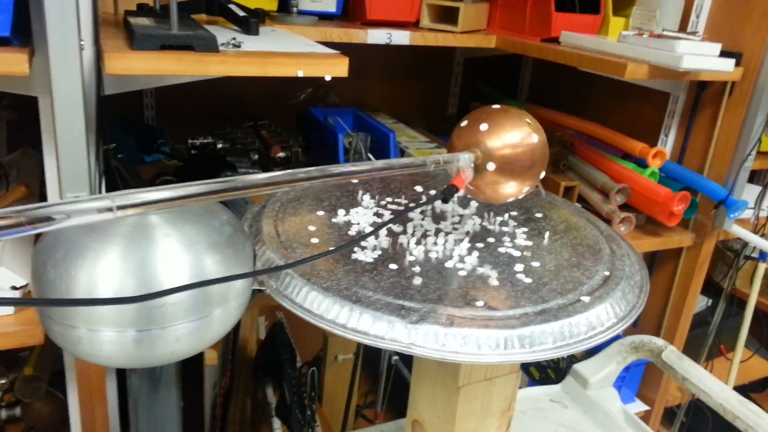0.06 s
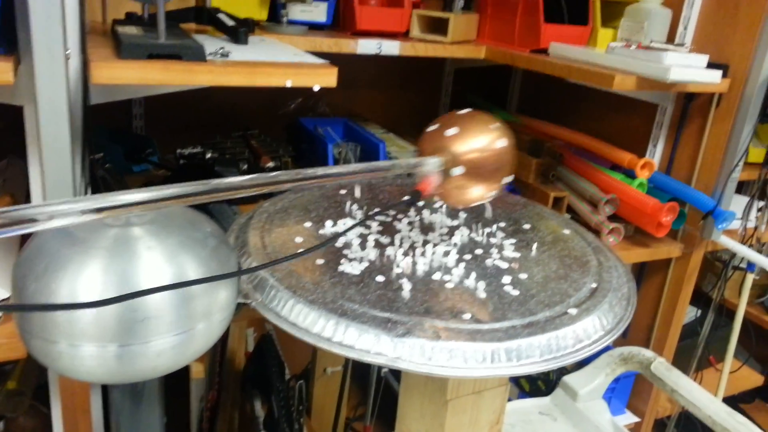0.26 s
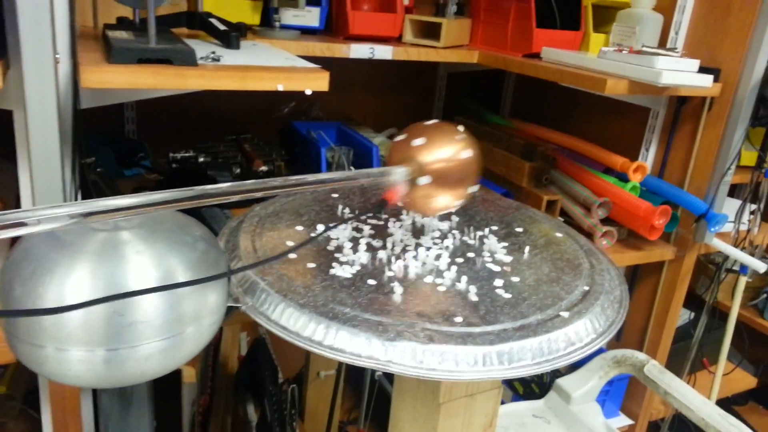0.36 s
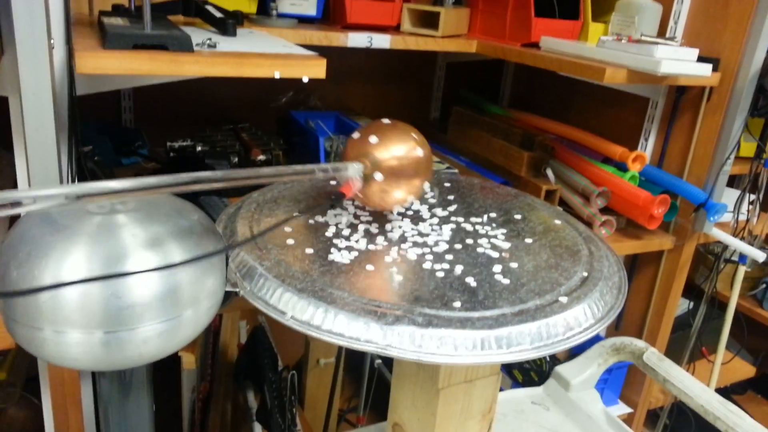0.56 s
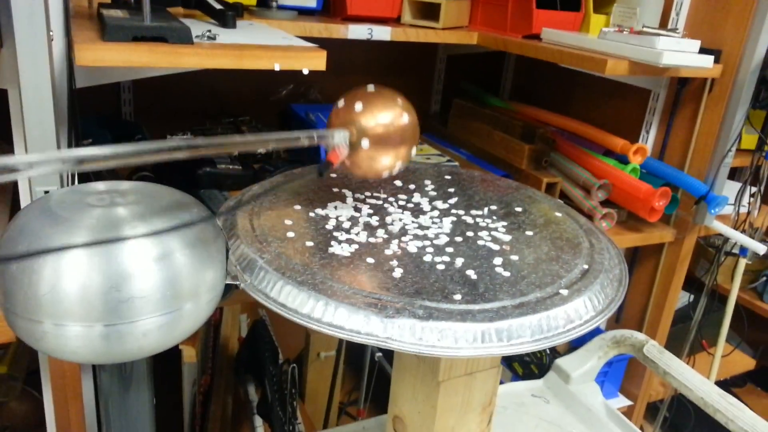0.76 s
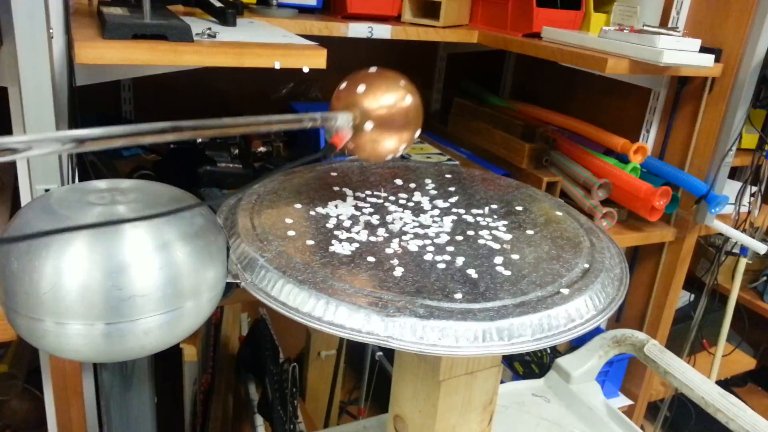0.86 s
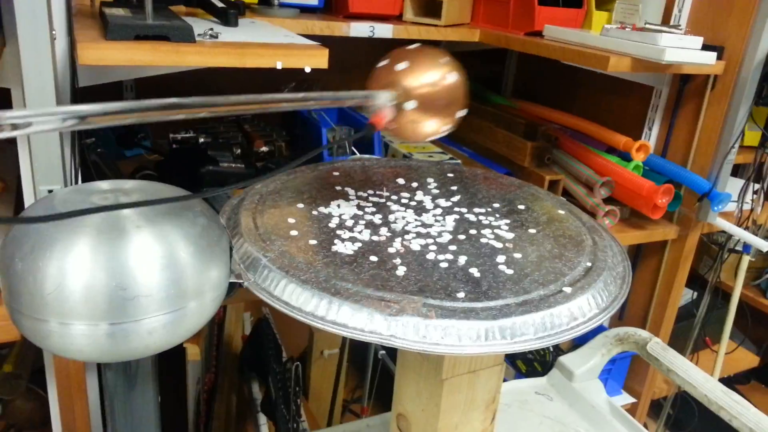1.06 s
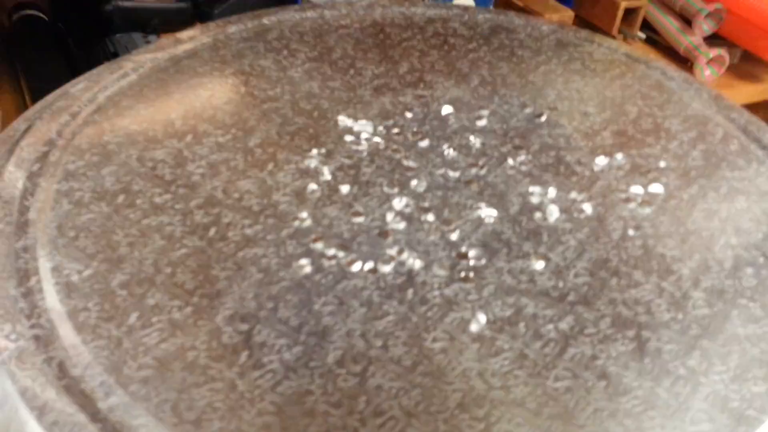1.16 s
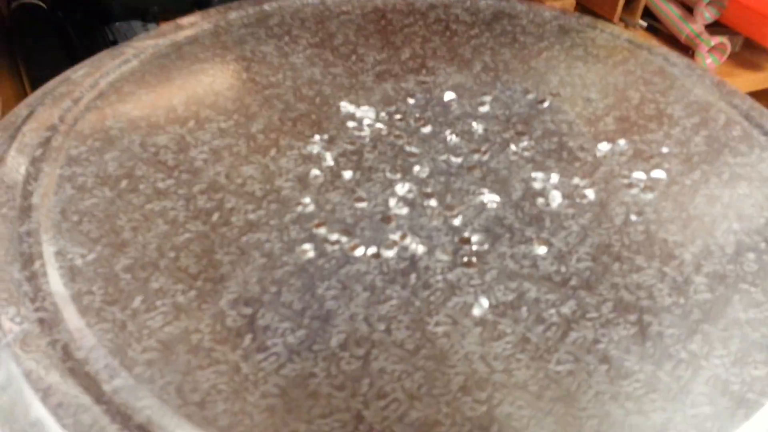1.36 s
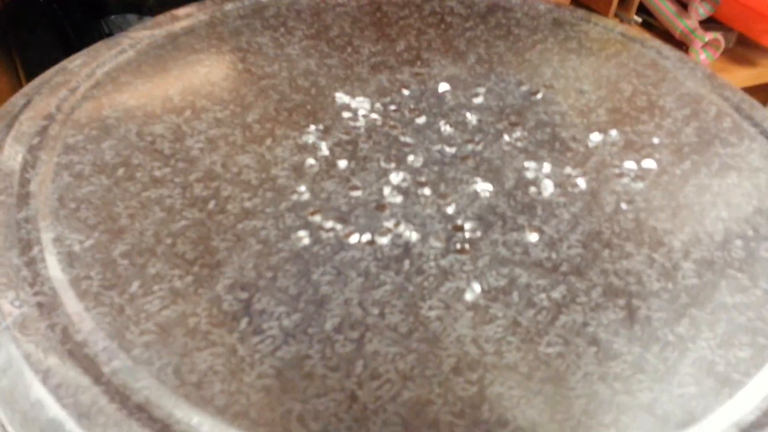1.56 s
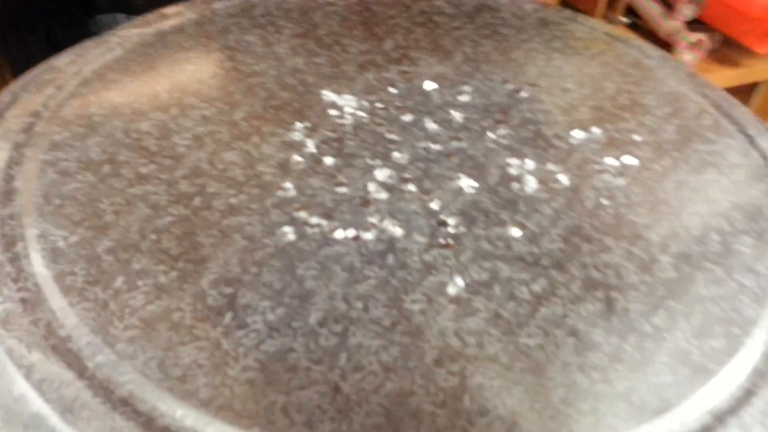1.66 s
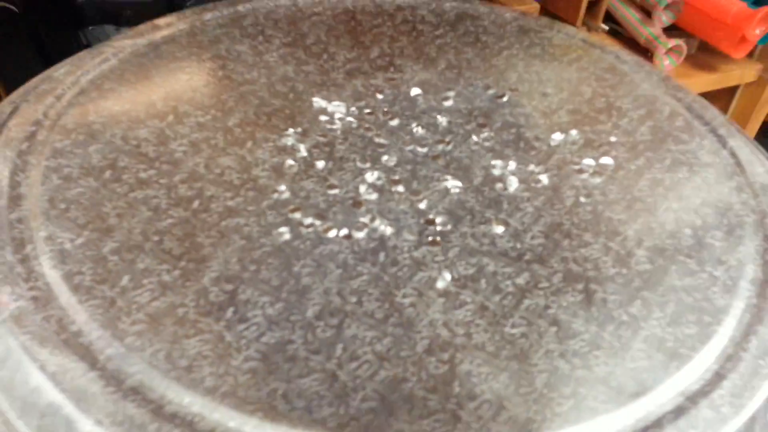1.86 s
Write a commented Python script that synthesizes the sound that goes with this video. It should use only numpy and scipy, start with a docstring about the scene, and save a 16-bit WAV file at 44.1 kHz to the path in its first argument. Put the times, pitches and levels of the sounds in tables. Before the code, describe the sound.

An electrostatic generator's motor whines with a fast throb and belt noise in a workshop. During the first 0.4 seconds, small sparks tick over a faint, high fizz. At about 0.45 seconds one loud, bright spark cracks, with a short room echo. The motor carries on until it cuts off at 1.2 seconds, leaving quiet room tone and several soft, dull bumps from 1.5 to 1.9 seconds.

```python
"""In a workshop, an electrostatic generator runs: its motor whines and throbs once a turn, and belt
noise rings the frame. Small sparks snap between a charged ball and a metal pan, over the fizz of
charge leaking into the air. One big spark cracks and the room throws it back. The motor sound ends
abruptly, leaving quiet room tone and a few soft bumps."""
import sys
import numpy as np
from scipy import signal
from scipy.fft import rfft, irfft
from scipy.io import wavfile
from scipy.ndimage import uniform_filter1d

SR = 44100
rng = np.random.default_rng(int(sys.argv[2]) if len(sys.argv) > 2 else 0)


def digitize_waveform(pressure):
    """Quantize a signal to 16-bit integers and store it at the path in sys.argv[1].

    Rows of a 2-D input are taken as channels; values are limited to [-1, 1].
    """
    field = np.atleast_2d(pressure).T
    bounded = np.clip(field, -1, 1)
    quanta = np.round(bounded * 32767).astype(np.int16)
    wavfile.write(sys.argv[1], SR, quanta)


N = 83790
T, HZ = np.arange(N) / SR, np.fft.rfftfreq(N, 1 / SR)
CRACK_S, MOTOR_END_S, SPARK_ATTACK_S = .44545, 1.195, .0002

# how fast the motor spins (time [s], speed [turns per second])
SHAFT_SPEED = [(0, 55.25), (.42, 54.95), (.6, 55.7), (1.2, 55.65)]
# how loud the whine is (time [s], level [dB])
WHINE_LEVEL = [(0, -43.5), (.09, -37), (.22, -41.5), (.32, -37), (.43, -39), (.58, -38), (.64, -42),
               (.72, -36), (.77, -45.5), (.86, -36), (.91, -36), (.97, -43), (1.03, -36), (1.11, -40.5),
               (1.19, -37.5)]
# the whine's tones (pitch [cycles per turn], level [dB], left minus right [dB])
WHINE_TONES = [(12, -5, 2), (13, 0, 2), (14, -12.5, 4)]
# the motor's fainter tones (pitch [cycles per turn], level [dB], left minus right [dB])
HUM_TONES = [(8, -55, -8), (21, -58.5, 5.5), (22, -56.5, 1.5), (26, -57, 0.5), (27, -51, 11.5),
             (31, -59.5, 1), (37, -56.5, 3.5)]
# belt and bearing noise (frequency [Hz], level [dB])
BELT_COLOUR = [(30, -92.5), (70, -95.5), (110, -84.5), (170, -76.5), (300, -75.5), (520, -76), (950, -78),
               (2150, -77.5), (2650, -87.5), (3800, -88), (6000, -91), (10500, -102), (12500, -126)]
# which side that noise leans to (frequency [Hz], left minus right [dB])
BELT_SIDE = [(500, 1), (1000, 2), (1650, 10.5), (2200, 5), (2900, -10.5), (3900, 5), (6000, 2),
             (9000, -2.5)]
# where the motor's frame rings (frequency [Hz], width [Hz], boost [dB])
FRAME_RINGS = [(303, 45, 8), (440, 35, 4), (510, 65, 7), (695, 60, 10.5), (1185, 90, 5), (1490, 100, 8),
               (2070, 120, 5)]
def motor():
    """Neighbouring tones beat, so the whine throbs once a turn; belt noise rings the frame."""
    speed, swell = curve(SHAFT_SPEED), undb(curve(WHINE_LEVEL))
    turn = 2 * np.pi * np.cumsum(speed) / SR
    turn -= np.interp(.415, T, turn)  # one throb peaks at this time
    lag = 2 * np.pi * speed * np.array([[-.00006], [0]])  # the whine reaches the left side later
    whine, hum = 0, 0
    for order, db, side in WHINE_TONES:
        gain = undb(db + 1.2 * waver(11)) * pan(side)
        whine += gain * np.cos(order * (turn + lag) + .15 * waver(41))
    for order, db, side in HUM_TONES:
        right_shift = np.array([[0], [1]]) * min(order / 20, 1) ** 2
        phase = rng.uniform(-.68, 1) + .55 * waver(35) + right_shift
        hum += undb(db + 3 * waver(15.96)) * pan(side) * np.cos(order * turn + phase)
    tones = np.sqrt(2) * swell * (whine + hum / swell.mean())
    frame = sum(db / (1 + (2 * (HZ - hz) / width) ** 4) for hz, width, db in FRAME_RINGS)
    belt = noise(BELT_COLOUR, grain=.31, pan_db=over_hz(BELT_SIDE), boost_db=frame)
    belt *= (1 + .087 * np.cos(turn)) * undb(.44 * waver(17))
    dip = undb(-17.5 * burst(CRACK_S - .0083, .002294, .0089, .032))  # briefly quieter at the crack
    ending = np.clip((MOTOR_END_S - T) / .004 + .5, 0, 1)
    return (tones + belt) * dip * ending


# the crack and its bounces off the pan (delay [s], level [dB])
PAN_BOUNCES = [(0, 0), (.00019, -5), (.00039, -1)]
# duller single echoes from the right (delay [s], level [dB])
SINGLE_ECHOES = [(.0120, -13), (.0143, -12), (.0162, -12), (.0198, -11), (.0363, -14), (.0422, -14),
                 (.0523, -15)]
# the room's wash of echoes (frequency [Hz], level [dB])
ECHO_COLOUR = [(100, -76.5), (400, -72.5), (1000, -67.5), (2500, -68), (4500, -67), (7000, -61),
               (10000, -66.5), (14500, -68.5)]
def big_spark():
    """A shock wave thumps the microphone, then bounces back from shelves and walls."""
    crack = sum(undb(db) * shock(CRACK_S + delay, hz=7800) for delay, db in PAN_BOUNCES)
    slaps = sum(undb(db) * shock(CRACK_S + delay, hz=5200) for delay, db in SINGLE_ECHOES)
    age, thump_hz = np.maximum(T - CRACK_S, 0), 310.8
    swing = np.sin(2 * np.pi * thump_hz * age) * np.exp(-age / .00079)
    thump = -np.gradient(swing) * SR / (2 * np.pi * thump_hz)
    arrival = CRACK_S + .0118
    early = undb(-5.5) * (T > CRACK_S) * (T < arrival)
    first = undb(1) * burst(arrival, SPARK_ATTACK_S, hold=.0018, decay=.008)
    tail = burst(arrival, SPARK_ATTACK_S, hold=.024, decay=.21 / np.log(1000))  # 60 dB down in .21 s
    echo = noise(ECHO_COLOUR, grain=.45, pan_db=.5) * np.sqrt(early ** 2 + first ** 2 + tail ** 2)
    return undb(-1) * pan(5) * crack + undb(-12) * pan(-21.5) * thump + pan(-9) * slaps + echo


# each small spark (time [s], level [dB], left minus right [dB], fade time [s])
SMALL_SPARKS = [(0.0335, -72.5, 2, 0.0051), (0.0548, -71.5, 2, 0.011), (0.0917, -79, 4, 0.005),
                (0.1256, -76.5, 5, 0.0064), (.1340, -70, 4, 0.0072), (0.1753, -82, -1, 0.0044),
                (0.2123, -71.5, 1.5, 0.0084), (0.3361, -66, 0.5, 0.0056), (0.366, -77.5, -0.5, 0.0097),
                (0.3853, -77, 4, .007), (0.405, -79, 4, 0.0023)]
# their sizzle (frequency [Hz], level [dB])
SIZZLE_COLOUR = [(500, -11), (2000, -0.5), (3500, -10), (4800, 0), (7000, 2), (9000, -3.5), (11500, -1.5),
                 (15000, -14.5)]
def small_sparks():
    """Each spark makes a tick, a short sizzle and an echo; one sets the pan ringing."""
    ticks, near_power, far_power = 0, 0, 0
    for start, db, side, decay in SMALL_SPARKS:
        size = undb(db) * pan(side)
        tick_db = 53.5 + 2 * min(db + 71, 0)  # faint sparks lose their tick
        ticks += size * undb(tick_db) * shock(start, hz=6200)
        near_power += (size * burst(start, SPARK_ATTACK_S, hold=.0013, decay=decay)) ** 2
        far_power += (size * burst(start, attack=.00568, hold=0, decay=.19 / np.log(1000))) ** 2
    sizzle = noise(SIZZLE_COLOUR, grain=.244) * np.sqrt(near_power)
    echo = undb(-17.5) * noise(SIZZLE_COLOUR) * np.sqrt(far_power)
    ping = np.sin(2 * np.pi * 5130 * T) * burst(.3865, SPARK_ATTACK_S, hold=0, decay=.005)
    return ticks + sizzle + echo + undb(-40.5) * ping


# how loud the fizz is (time [s], level [dB])
FIZZ_LEVEL = [(0, -84.5), (.08, -92), (.12, -84), (.19, -103.5), (.28, -97.5), (.34, -99.5), (.375, -85.5),
              (.41, -77.5), (.44, -94), (.47, -125)]
# how bright the fizz is (frequency [Hz], level [dB])
FIZZ_COLOUR = [(1000, -19.5), (4000, 3.5), (7500, -1), (11000, 1.5), (15000, -7)]
# its thin, high singing (frequency [Hz], level [dB])
SING_COLOUR = [(6700, -125), (7150, -81.5), (7500, -88), (8000, -80), (8600, -125)]
def leaking_charge():
    """Charge leaks into the air in tiny clicks, and sings as the ball nears the pan."""
    sing = noise(SING_COLOUR, pan_db=-10) * burst(.29, attack=.045, hold=0, decay=.025)
    fizz = noise(FIZZ_COLOUR, grain=.65) * undb(curve(FIZZ_LEVEL))
    return sing + fizz * (T < MOTOR_END_S)


# the room's steady hush (frequency [Hz], level [dB])
ROOM_COLOUR = [(30, -113), (80, -115), (160, -92.5), (420, -89.5), (560, -100), (750, -104), (870, -97.5),
               (1020, -107.5), (6000, -122), (14500, -121)]
# each soft bump (time [s], level [dB])
SOFT_BUMPS = [(1.480, -8), (1.576, -11), (1.64, -11.5), (1.717, -3.5), (1.822, -6), (1.866, -3),
              (1.883, -11)]
# the rustle in a bump (frequency [Hz], level [dB])
RUSTLE_COLOUR = [(90, -108), (170, -74.5), (450, -79), (680, -87), (850, -85), (1100, -93), (3000, -104),
                 (14000, -119)]
def quiet_room():
    """A low hush swells in after the motor, with soft bumps: a dull thud and a short rustle each."""
    rise = undb(-14.5 * np.clip(1 - (T - MOTOR_END_S) / .2, 0, 1))
    rustles, thuds = 0, 0
    for start, db in SOFT_BUMPS:
        rustles += undb(db) * burst(start, attack=.008, hold=.0031, decay=.016)
        hz = 235 * np.exp(.1 * rng.standard_normal())
        tone = np.sin(2 * np.pi * hz * (T - start))
        thuds += undb(db - 47) * burst(start, attack=.005, hold=0, decay=.007) * tone
    hush = noise(ROOM_COLOUR) * rise * undb(1.4 * waver(7.1))
    return hush + noise(RUSTLE_COLOUR) * rustles + thuds


def shock(start, hz):
    """A spark's quick push and pull on the air, strongest around hz."""
    u = np.clip(2 * np.pi * hz * (T - start), -10, 10)
    return -u * np.exp(-u * u / 2)


def burst(start, attack, hold, decay):
    """Rise, hold, then die away; all times in seconds."""
    age = T - start
    return np.clip(age / attack, 0, 1) * np.exp(-np.maximum(age - attack - hold, 0) / decay)


def noise(colour, grain=0., pan_db=0., boost_db=0.):
    """Stereo noise; colour sets its mix of low and high, and grain breaks it into clicks."""
    sizes = np.exp(grain * np.clip(rng.standard_normal((3, N // 16 + 1)), -2, 2))
    white = rng.standard_normal((3, N)) * np.repeat(sizes, 16, axis=1)[:, :N]
    parts = rfft(white / white.std())
    alike = .9 / (1 + (HZ / 911.5) ** 4)  # both sides hear nearly the same bass
    both = np.sqrt(alike) * parts[0] + np.sqrt(1 - alike) * parts[1:]
    shape = undb(over_hz(colour) + boost_db) * (HZ < 14600)
    return irfft(both * shape * pan(pan_db), N) * np.sqrt(SR / 2)


def waver(rate):
    """A smooth random wobble of size about 1; a higher rate is quicker."""
    size = max(int(SR / rate), 20)
    held = rng.standard_normal(N // 20 + 1)[np.arange(N) // size]
    slow = uniform_filter1d(uniform_filter1d(held, size), size)
    return slow / slow.std()


def undb(db):
    """Decibels to gain."""
    return 10 ** (np.asarray(db) / 20)


def curve(rows):
    """Join (time [s], value) rows with straight lines."""
    return np.interp(T, *np.array(rows).T)


def over_hz(rows):
    """Join (frequency [Hz], value) rows, with octaves evenly spaced."""
    hz, value = np.array(rows).T
    return np.interp(np.log(np.maximum(HZ, 1)), np.log(hz), value)


def pan(db):
    """Left and right gains; positive db leans left."""
    return undb(np.array([[1], [-1]]) * db / 2)


def scene():
    """Motor, sparks, fizz and room together."""
    return motor() + small_sparks() + leaking_charge() + big_spark() + quiet_room()


# how the microphone's openings ring, left then right (frequency [Hz], width [Hz], ring level [dB])
MIC_RINGS = [(5496, 1300, 4), (7180, 1080, 11)]
def record(dry):
    """Each microphone opening rings at its own pitch; peaks are rounded, deep bass and top are cut."""
    ringing = np.array([x + undb(db) * signal.lfilter(*signal.iirpeak(hz, hz / width, fs=SR), x)
                        for x, (hz, width, db) in zip(dry, MIC_RINGS)])
    rounded = .85 * np.tanh(ringing / .85)
    thinned = signal.sosfilt(signal.butter(2, 69.5, "high", fs=SR, output="sos"), rounded)
    return signal.sosfilt(signal.ellip(8, .2, 70, 16500, fs=SR, output="sos"), thinned)


dry = scene()
out = record(dry)
digitize_waveform(out)
```